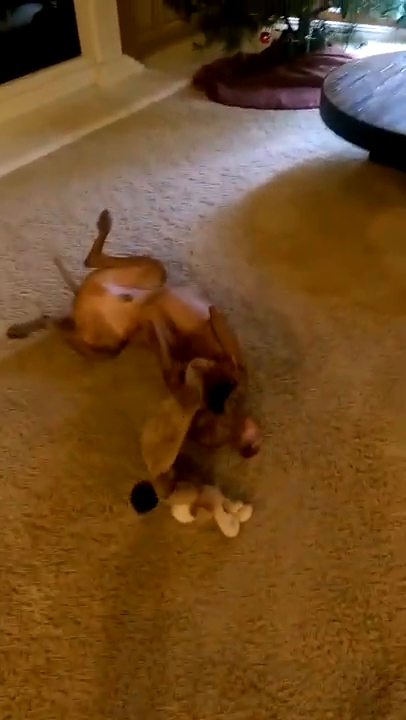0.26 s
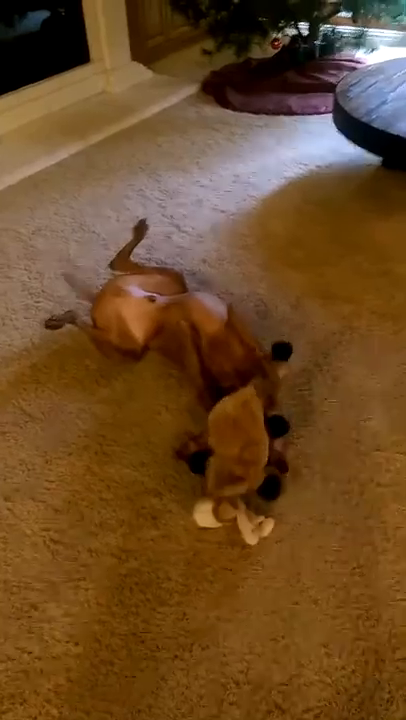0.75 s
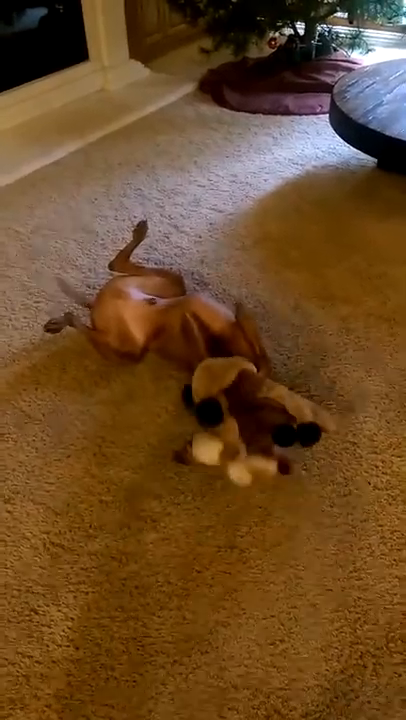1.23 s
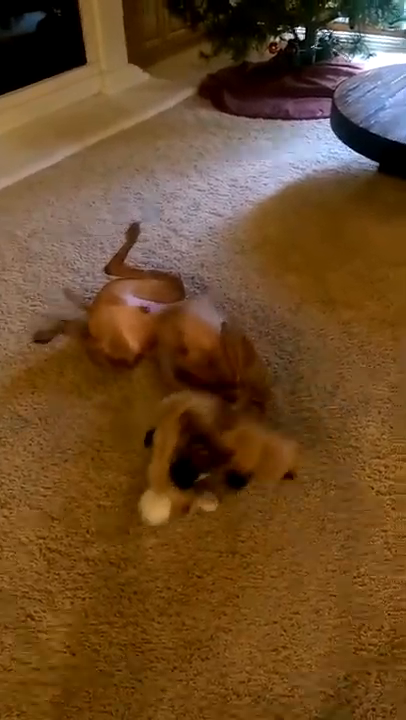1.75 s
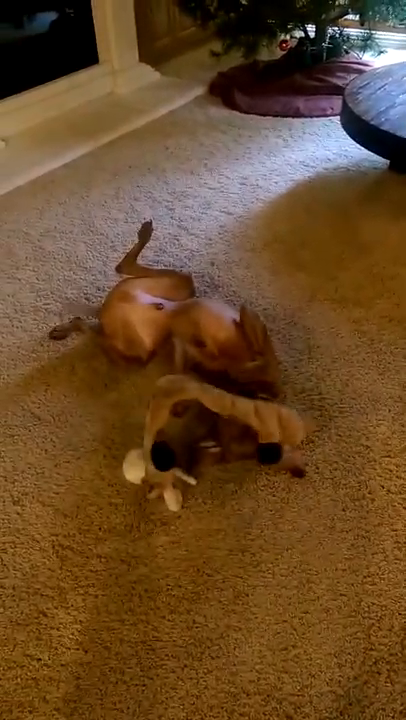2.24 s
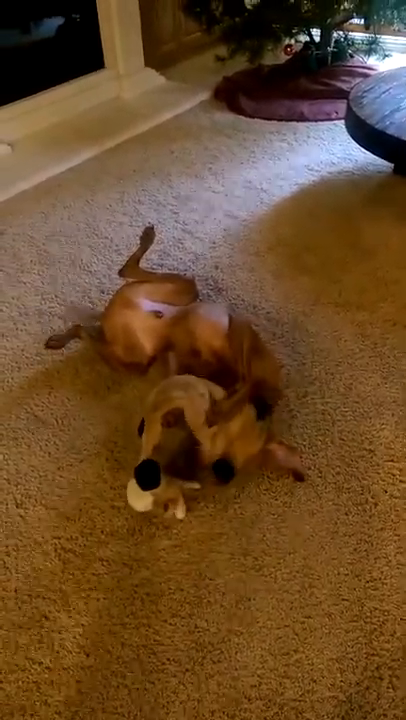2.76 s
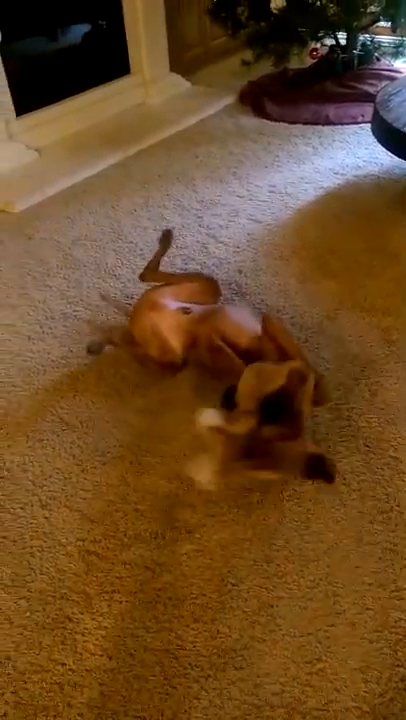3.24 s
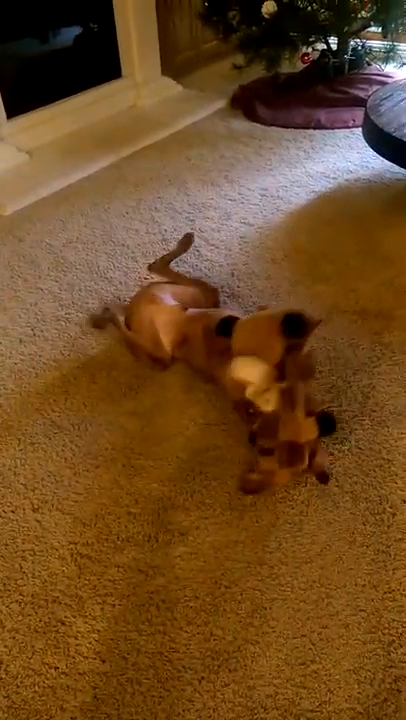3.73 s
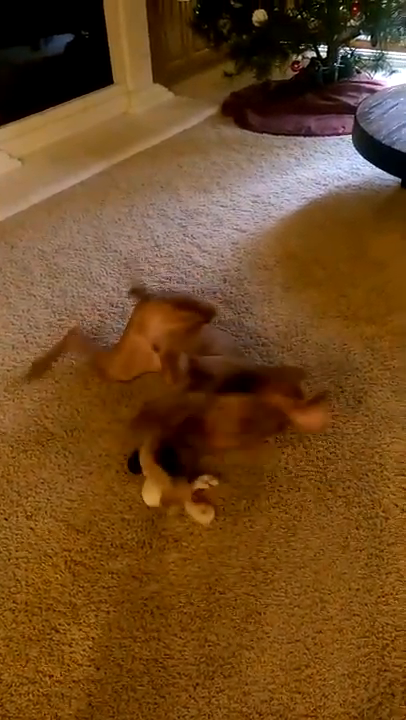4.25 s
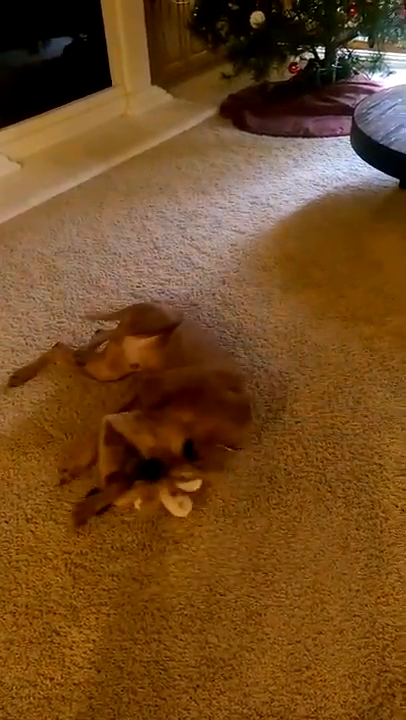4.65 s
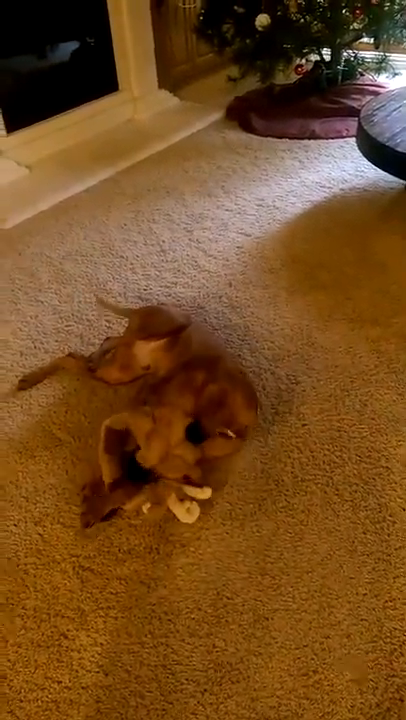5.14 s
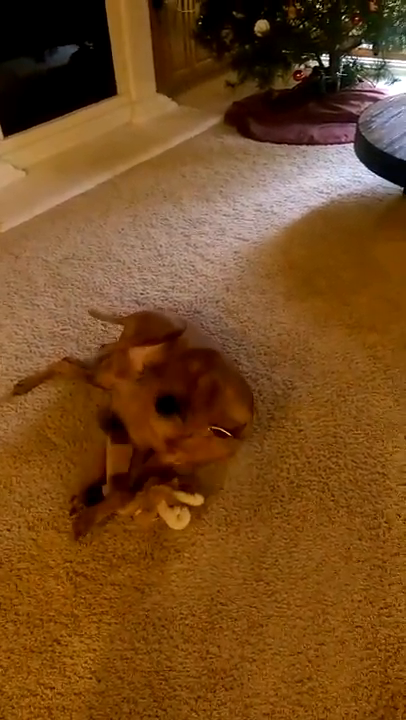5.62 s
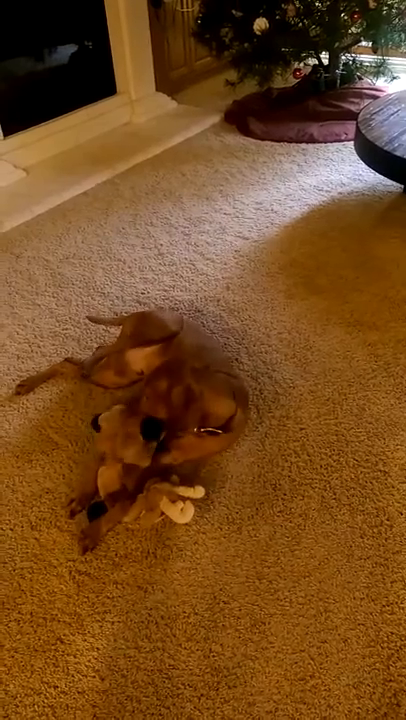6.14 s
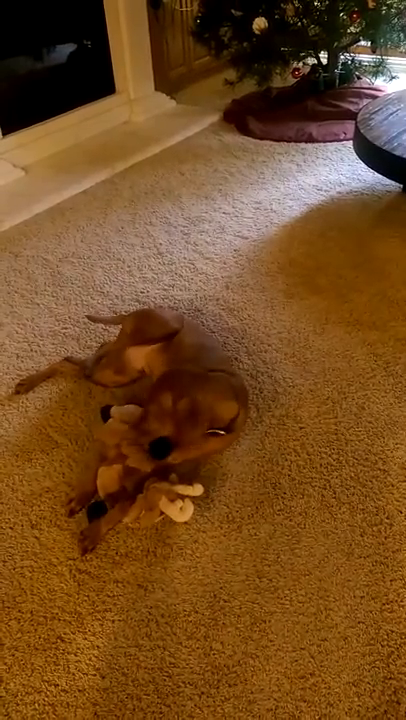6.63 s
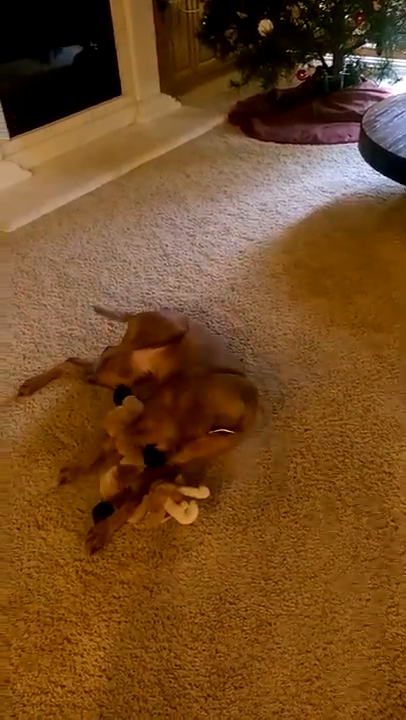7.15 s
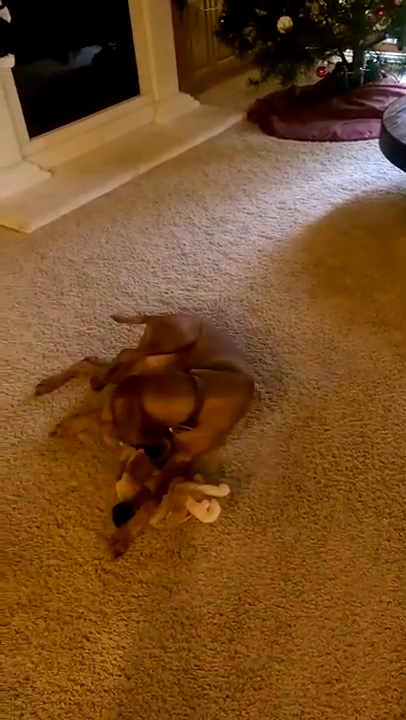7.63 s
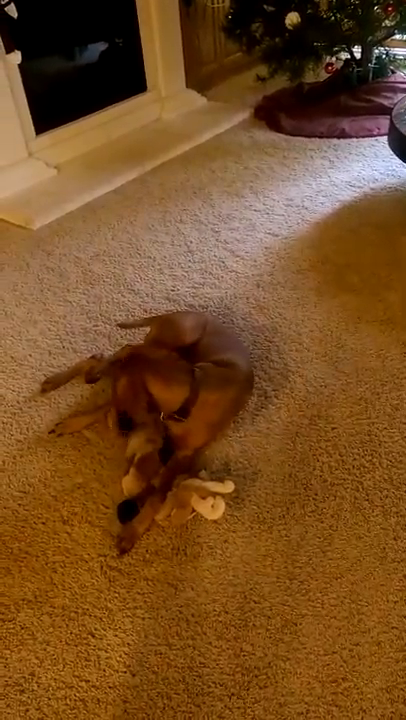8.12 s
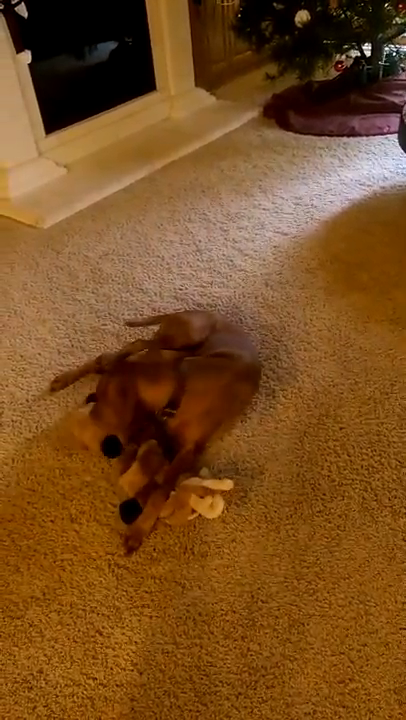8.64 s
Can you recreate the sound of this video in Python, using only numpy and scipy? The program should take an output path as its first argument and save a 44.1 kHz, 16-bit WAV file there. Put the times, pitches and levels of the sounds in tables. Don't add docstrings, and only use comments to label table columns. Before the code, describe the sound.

Indoors on carpet, a dog chews a squeaking plush toy close to a handheld phone, over low mains hum, rumble and faint hiss. A squeak is already fading at the start; quick chirps follow at 0.2 and 0.3 seconds, then a blip and a leaping, falling squeak near 0.8-0.9. Light rustle and faint wheezing air lead to one high quick bite at 2.1. After a lull, the busiest run goes from 3.4 to 5.7: raspy stalling buzzes, a steady high squeak at 3.6, arches and croaks, sharp teeth knocks, plush rubbing, and a very steep shrill chirp at 5.6. A tag clinks faintly at 4.9 and brightly at 6.1, beside a flat buzz and low squeak. Then mostly quiet rustle, with a clear clink at 6.9 and a soft tick at 7.8. Weak low squeaks come at 8.0, 8.15 and 8.5. Short room echoes trail each sound, nearer on the left.

```python
import sys
import numpy as np
from scipy import signal
from scipy.io import wavfile
from scipy.ndimage import uniform_filter1d

SR = 44100
rng = np.random.default_rng(int(sys.argv[2]) if len(sys.argv) > 2 else 0)


def volts(x):
    e = np.asarray(x, float) / 20
    return 10 ** e


def store_wav(level_fs):
    pcm = np.round(np.clip(np.atleast_2d(level_fs), -1, 1) * 32767)
    wavfile.write(sys.argv[1], SR, pcm.T.astype(np.int16))


N = 391608
LEAD = 11025

# (start [s], length [s], pitch [Hz], surge after [s])
REFILLS = [
    (0.792, 0.014, 823, 0.014),
    (5.445, 0.092, 845, 0.064),
]
SURGE_UP, SURGE_DB, SURGE_S = 0.032, 1, 0.015
DROOP, DROOP_S = 0.034, 0.015
# (start [s], rise [s], settling [s], top pitch [Hz], end pitch [Hz])
BITES = [
    (-.18, 0.033, 0.15, 1150, 1093),
    (2.119, 0.034, 0.026, 1732, 1177),
    (8.151, .02, 0.038, 1047, 890),
    (8.525, 0.014, 0.0085, 940, 960),
]
ONSET_HZ, SETTLE_S, FAINT_DB, FAINT_HZ = 908, .02, -8.5, 162
# (time [s], reed pitch [Hz], push [dB])
WRESTLED = [
    [(.171, 841, 0), (.18, 777, -7.5), (.2, 832.5, -1), (.234, 850, 0), (.25, 1590, -0.5), (.263, 2177, 1),
     (.274, 3120, 3.5), (.282, 3000, -9), (.293, 2600, -3)],
    [(.324, 950, -3), (.35, 974, -3), (.356, 1071, -3), (.385, 1211, 0), (.41, 1166, -0.5),
     (.435, 1144, -0.5), (.452, 962, -2.5)],
    [(.88, 870, -5), (.89, 1291, -4.5), (.903, 1457, 1.5), (.93, 1191, -5), (.96, 1066, -5.5),
     (.985, 884, -20), (1.03, 759, -16)],
    [(4.518, 938, -10.5), (4.532, 1060, -1.5), (4.553, 1320, -0.5), (4.579, 1264, -0.5),
     (4.584, 1490, -2.5), (4.593, 1490, 2.5), (4.597, 1616, 0.5), (4.604, 1079, -6.5), (4.625, 840, -12.5)],
    [(5.555, 897, -14), (5.575, 1147, -5.5), (5.59, 2222, 4), (5.6, 3247, -3), (5.606, 3380, -1),
     (5.62, 3184, 0.5), (5.638, 2444, 2.5), (5.652, 1285, -3), (5.68, 843, -13)],
]
# (time [s], reed pitch [Hz], push [dB])
STALLED = [
    [(4.427, 822, -1), (4.435, 870, 1), (4.445, 900, 2.5), (4.455, 871, -4), (4.47, 880, -18.5)],
    [(3.456, 834, 5.5), (3.48, 832, -2.5), (3.495, 689, -12.5), (3.505, 772, -6), (3.518, 777, 5.5)],
    [(3.982, 770, 2.5), (3.99, 890, -2), (4.002, 863, 3), (4.015, 787, -5), (4.032, 820, 0),
     (4.046, 780, -6.5)],
    [(5.038, 950, -6), (5.05, 1074, 0), (5.06, 1314, 0.5), (5.075, 1110, -0.5), (5.1, 977, -3),
     (5.118, 1024, -3), (5.14, 824, -9)],
]
# (time [s], reed pitch [Hz], level [dB])
HELD = [
    [(3.614, 1010, -29.5), (3.62, 1085, -29.5), (3.632, 1197, -26), (3.672, 1205, -30),
     (3.684, 1214, -29.5), (3.7, 1212, -29.5), (3.718, 1205, -27.5)],
    [(4.064, 850, -40), (4.078, 1169, -31), (4.086, 1289, -24.5), (4.11, 1796, -23.5), (4.118, 1648, -29),
     (4.134, 1190, -25.5), (4.15, 947, -39), (4.16, 838, -32.5)],
    [(6.045, 840, -36), (6.053, 820.4, -34.5), (6.119, 830, -36), (6.139, 864, -32.5), (6.153, 830, -34),
     (6.165, 815, -36)],
    [(6.182, 900, -43), (6.194, 984, -37), (6.212, 1111, -29), (6.214, 1108, -31), (6.238, 945, -35),
     (6.272, 952, -35), (6.286, 916, -40.5), (6.302, 913, -32)],
    [(7.956, 817, -45.5), (7.968, 852, -43.5), (8.0, 832, -43), (8.024, 868, -41), (8.052, 828, -42),
     (8.106, 818, -43.5), (8.122, 760, -47)],
]
# (effort [dB], air out 1 or in 0, jaws open [dB], plush cover [dB], cheek hollow [dB])
GRIP = [(-35.5, 0.97, -5, 9, 2.5), (-26.5, 0.13, 3, 2, -1), (-29, 0.89, -3.5, -0.5, 2.5),
        (-32.5, -0.19, -0.5, 6, 1.5), (-28.5, 0.92, -2.5, -0.5, 5), (-26.5, 0.86, -1.5, 0.5, 2.5),
        (-27, -0.15, -3.5, -3.5, -3.5), (-25, 1, -5, 0, -6), (-27.5, -0.63, -2.5, -4.5, 2),
        (-23.5, 0.63, -5, -0.5, -2.5), (-29, -0.43, -6.5, -1.5, -2), (-27, 0.58, 4, -0.5, 2),
        (-27.5, 0.89, 5, -4, 1.5), (-28.5, -.3, 6, -2.5, 6.5), (-23.5, 0.78, 4.5, -2.5, -1),
        (-29.5, -0.43, 10.5, -1.5, -2.5), (-27, 0.95, 20.5, 11.5, 0.5), (-42.5, 0.17, 5.5, 5.5, -0.5),
        (-37.5, 1, 8.5, 12.5, 5.5), (-31, 1, 17, 19.5, 5.5)]
# (lips sealed over lowest band [dB], tongue under middle [dB], teeth gap [dB])
SEAL = [(3, -4.5, -6), (-1.5, -1.5, 2.5), (1, 1.5, -0.5), (-0.5, -4, -1), (0, 0, 0), (-1.5, .5, -0.5),
        (1, 3.5, 3), (-1.5, -1.5, 0), (-2.5, 0.5, 2.5), (-2, -0.5, .5), (-1, -4, -1.5), (-1, 0, 0),
        (-0.5, -0.5, -0.5), (-1, -0.5, -1.5), (-3, 0.5, 0.5), (.5, .5, -1.5), (-1.5, -4, -1),
        (0.5, -2, -0.5), (-2, -1.5, 1.5), (2, -3.5, -1.5)]
# (notch of carpet echo [Hz], left minus right [dB], extra sent to room [dB])
PLACES = [(7000, 9.5, -3), (7650, 5, -1), (6780, 6, 0), (7200, 6.5, 4), (6760, 4.5, 1.5), (6800, 5.5, 2.5),
          (7140, 5, -1), (6900, 5.5, 0), (7700, 4, -2.5), (7100, 5.5, 0), (7950, 5, 1.5), (6850, 5.5, -2),
          (6770, 4, -1.5), (7220, 4, -3), (6760, 5, -1), (4540, 5, -0.5), (6500, 3.5, 0), (9000, 5, 3),
          (6270, 4.5, 3.5), (6600, 5, 4)]
LEAK = [-4, -18, -13, -6, -5, -9, -15, -6, -18, -7, -20, -15, -17, -27, -17, -36, -12, -32, -6, -5]
LIMP = [0, 0, .02, 0, .01, .03, 0, .033, 0, .03, 0, 0, 0, 0, 0, 0, 0, 0, .035, .035]

# (low edge [Hz], high edge [Hz])
MUFFLE_HZ = [(600, 1400), (1400, 2800), (2800, 4400), (4400, 6200), (6700, 8400), (9000, 12000),
             (12000, 15500)]
AIR_IN_DB = [-15, -4, -11, -5.5, -12, -19, -22]
AIR_OUT_DB = [-7.5, -5, -9, -4.5, -19.5, -11.5, -12.5]
JAW_SHARE = [-0.19, -0.11, -0.041, -0.36, 0.9, 0.56, 0.2]
COVER_SHARE = [0.23, -0.13, 0.19, -0.29, -0.11, -0.41, -2]
CHEEK_SHARE = [0, 0.92, 0.023, 0.1, 0, 0.088, 0]
SEAL_SHARES = [
    [1, 0, 0, 0, 0, 0, 0],
    [0, 0, 1, 0, 0, 0, 0],
    [0, 0, 0, 1, .5, 0, 0],
]
FRAY_HZ, LOW_SHARE = 2800, .7
SCATTER_DB = 6

# (frequency [Hz], level [dB], t60 [s])
TAG = [(5652, -14, .4), (5825, -18, .13), (9200, -30, .1), (12030, -24, .35), (12810, -26, .25),
       (13700, 0, .42), (14990, -28, .12)]
TWIST_HZ = 12030
TOUCH_DB, TOUCH_S, HELD_DB_PER_S = -23, 0.0082, -120
# (time [s], peak [dB], tilt of ringing [dB per octave], tick [dB], off-centre [dB])
CLINKS = [
    (4.925, -64, -14, 14.5, 23),
    (4.951, -63, -1, -11.5, 21),
    (6.068, -45, -11, 4, 2),
    (6.902, -44, -4, 6, -1),
    (6.947, -82, -2, 18, 0),
    (7.765, -69, -1, 11, 0.1),
]
# (time [s], peak [dB], centre [Hz], length [s])
KNOCKS = [(0.686, -47.5, 5510, 0.0031), (0.735, -57, 9000, 0.0022), (0.749, -52.5, 7000, 0.0052),
          (1.173, -47.5, 10000, .003), (1.192, -48, 11500, 0.0054), (1.744, -63, 2500, .003),
          (2.164, -50, 250, 0.027), (3.043, -58.5, 5050, 0.0024), (3.358, -53, 1270, 0.005),
          (3.398, -55, 2500, 0.016), (3.416, -45, 11500, 0.029), (3.421, -50, 2530, 0.02),
          (3.967, -39, 3140, 0.0042), (4.595, -23, 4540, 0.0064), (4.916, -42, 1404, 0.0019),
          (4.918, -50, 593, 0.0044), (4.916, -40.5, 7000, 0.0011), (3.714, -23.5, 2390, 0.0034),
          (3.72, -38, 1200, .005), (2.172, -43.5, 750, 0.0089), (8.153, -48, 2500, .003),
          (8.19, -47, 1400, 0.0091), (8.523, -43.5, 1400, .004), (8.535, -49, 1400, .008),
          (7.97, -44, 5000, .003), (5.442, -37.5, 4960, 0.0036), (8.433, -55, 2820, 0.0055),
          (8.44, -53.5, 5000, 0.0045), (8.463, -59, 5000, .004)]
# (peak time [s], level [dB], rise [s], fall [s])
RUSTLE = [(1.13, -60.5, 0.009, 0.2), (1.516, -66.5, 0.14, 0.072), (1.9, -67, 0.063, 0.027),
          (2.068, -65, 0.14, 0.059), (3.214, -70, 0.0085, 0.15), (3.429, -55, 0.088, 0.029),
          (3.85, -56, .01, 0.18), (3.97, -51, .05, 0.02), (4.79, -58, 0.0093, 0.16),
          (6.836, -71, 0.0091, 0.096), (7.01, -72.5, .01, 0.15), (7.288, -67.5, .2, .1),
          (7.468, -73, .15, 0.057), (7.764, -67.5, 0.021, 0.23), (7.95, -63, .02, .01),
          (8.118, -49, 0.0092, 0.032), (6.168, -51, .01, .03), (8.31, -69, .01, 0.21),
          (8.443, -64.5, 0.021, 0.041)]
# (frequency [Hz], level [dB per Hz])
RUSTLE_COLOUR = [(470, -46), (800, -18.5), (1420, -7), (1740, -16.5), (2500, -4.5), (3650, -7),
                 (11300, -13.5), (16000, -20)]
STROKE_DB = -17
# (start [s], length [s], frequency [Hz], level [dB])
WHEEZES = [
    (1.971, .14, 2120, -73),
    (2.04, 0.049, 1290, -68),
]

# (frequency [Hz], level [dB])
PHONE = [(300, -39.5), (700, 1), (1000, -2.5), (5000, 4.5), (12000, 1.7), (14300, -4.5), (15300, -8),
         (15900, -13.5)]
# (frequency [Hz], share of left-right difference [dB per dB])
SHADOW = [(850, 0.48), (1200, 1.3), (2400, 2.06), (5000, 3.5), (9000, 5), (12000, 3.5), (15000, -0.9)]
# (frequency [Hz], t60 [s])
ROOM = [(600, 0.51), (1600, 0.56), (4200, 0.52), (8000, 0.5), (13000, 0.34)]
# (delay [s], level [dB])
ECHOES = [(.0021, -10), (.0068, -11), (.0115, -12), (.017, -13), (.024, -14)]
# (frequency [Hz], level [dB], t60 [s])
STANDING = [(950, -14.5, .5), (1110, -17.5, .5), (1205, -3.5, .8), (1500, -11, .6), (1690, -4.5, 0.9),
            (1890, -7.5, .6), (2030, -6.5, .6), (2410, -9.5, .7)]
# (frequency [Hz], level [dB])
ROOM_LEFT = [(600, 2), (850, -5), (1100, -1.5), (1500, -5), (4000, -2), (8000, -1.5), (13000, 3)]
# (frequency [Hz], level [dB])
ROOM_RIGHT = [(600, 2.5), (850, -5.5), (1100, -0.5), (1500, -1), (4000, -2), (8000, -11.5), (13000, 1.5)]
# (frequency [Hz], level [dB per Hz])
HUSH = [(12, -27.5), (25, -6.5), (48, -19), (75, -14.5), (117, 0), (169, -20.5), (217, -0.5), (296, -12.5),
        (426, -14), (518, -12), (1140, -17), (3000, -23), (14000, -26.5), (15800, -28.5)]
HUSH_DB = -60
# (frequency [Hz], width [Hz], level [dB])
HUM = [(61, 10, -70), (165, 8.2, -72.5), (211.5, 12, -67.5), (250, 23, -81), (292, 11.6, -76.5),
       (357, 24, -72), (421.7, 14, -71)]
# (frequency [Hz], correlation [-1 to 1])
SAME = [(60, 0.43), (180, 0.88), (550, 0.34), (1650, 0.32), (4970, 0.051), (15000, -0.39)]
# (frequency [Hz], left minus right [dB])
LEAN = [(60, 4.07), (180, 0.65), (550, 0.91), (1650, 1.0), (4970, 3.1), (15000, 1.57)]
STIR_DB, STIR_LAG_S, STIR_S = 10.5, 0.036, 0.34
EDGE_HZ = 16100


def evened(x):
    return x / np.sqrt(np.mean(x ** 2) + 1e-20)


def read(points, hz):
    f, value = np.transpose(points)
    return np.interp(np.log(hz + 1), np.log(f + 1), value)


def add(mix, s, sound):
    part = mix[..., LEAD + round(s * SR):][..., :sound.shape[-1]]
    part += sound[..., :part.shape[-1]]


def causal(db_of, x):
    log_gain = np.log(volts(db_of(abs(np.fft.fftfreq(2048, 1 / SR)))))
    taps = np.fft.ifft(np.exp(np.conj(signal.hilbert(log_gain)))).real[:1024]
    return signal.oaconvolve(x, taps)[:len(x)]


def slow(count, span):
    noise = rng.standard_normal(count)
    return evened(uniform_filter1d(uniform_filter1d(noise, span), span))


def bass(x):
    return signal.sosfiltfilt(signal.butter(3, FRAY_HZ, fs=SR, output="sos"), x)


def ports(x, pan_db):
    far = causal(lambda hz: -pan_db * read(SHADOW, hz), x)
    return volts(3.5) * np.array([x, np.roll(far, 2)])


def refill(start, length, hz, surge_s):
    t = np.linspace(0, length, num=40)
    surge = np.exp(-((t - surge_s) / SURGE_S) ** 2)
    droop = DROOP * np.exp((t - length) / DROOP_S)
    return np.transpose([start + t, hz * (1 + SURGE_UP * surge - droop), SURGE_DB * surge])


def bite(start, rise_s, settle_s, top_hz, end_hz):
    t = np.linspace(0, rise_s + settle_s, num=40)
    left = np.exp(-np.maximum(t - rise_s, 0) / SETTLE_S)
    hz = end_hz + (top_hz - end_hz) * (left - left[-1]) / (1 - left[-1])
    hz = hz - (top_hz - ONSET_HZ) * np.maximum(1 - t / rise_s, 0)
    return np.transpose([start + t, hz, FAINT_DB * np.exp((ONSET_HZ - hz) / FAINT_HZ)])


def strokes_of_jaw():
    rows = [refill(*r) for r in REFILLS] + [bite(*r) for r in BITES]
    rows += [np.array(r) for r in WRESTLED + STALLED]
    rows += [np.array(r) - [0, 0, np.max(r, axis=0)[2]] for r in HELD]
    return sorted(rows, key=lambda r: r[0, 0])


def mouth_colour(out, hold_db):
    air_in, air_out = np.array([AIR_IN_DB, AIR_OUT_DB])
    shares = np.array([JAW_SHARE, COVER_SHARE, CHEEK_SHARE, *SEAL_SHARES])
    return air_in + out * (air_out - air_in) + np.dot(hold_db, shares)


def squeak(rows, muffling, notch_hz, pan_db, leak_db, limp):
    s, hz, level_db = np.transpose(rows)
    t = np.arange(s[0], s[-1], 1 / SR)
    hz = uniform_filter1d(np.interp(t, s, hz), 200, mode="nearest")
    wobble = .004 * slow(len(t), 40)
    flutter = .06 * volts(leak_db) * slow(len(t), 16)
    order = np.arange(1, 22)[:, None]
    turns = np.cumsum(hz * (1 + wobble)) / SR
    turns = turns + np.clip((order - 1) / 4, 0, 1) * np.cumsum(hz * flutter) / SR
    limp = limp * np.clip((hz - 1120) / 60, 0, 1) * volts(3 * slow(len(t), 150))
    turns = turns + (order > 1) * limp * np.cos(np.pi * turns)
    push_db = np.interp(t, s, level_db)
    sag_db = level_db.max() - push_db
    round_db = 3.1 * np.log2(hz / 850) + 0.2 * sag_db
    strength_db = 2.0 * np.array([slow(len(t), 200) for _ in order]) - round_db * np.log2(order)
    harmonics = volts(strength_db) * (order * hz < 16500) * np.cos(2 * np.pi * order * turns)
    snaps = harmonics.sum(0)
    leak = rng.standard_normal(len(t)) * (0.57 + np.exp(-(turns[0] % 1) / 0.3))
    leak = evened(signal.lfilter([1, -.6], 1, leak)) * volts(.4 * sag_db)
    leak = evened(leak) - LOW_SHARE * bass(evened(leak))
    per_hz = [(np.sqrt(a * b), db - 10 * np.log10(b - a)) for (a, b), db in zip(MUFFLE_HZ, muffling)]

    def colour_db(f):
        carpet_notch = 12.0 * np.exp(-((f - notch_hz) / 400) ** 2)
        return read(per_hz, f) + read(PHONE, f) - carpet_notch

    tone = causal(colour_db, evened(snaps) + volts(leak_db) * leak)
    tone /= np.sqrt(uniform_filter1d(tone ** 2, 500, mode="reflect") + 1e-20)
    edges = np.clip(np.minimum((t - s[0]) / .004, (s[-1] - t) / .006), 0, 1)
    return ports(volts(push_db) * edges * tone, pan_db)


def wheeze(length, hz, db):
    t = np.arange(0, length, 1 / SR)
    return volts(db) * slow(len(t), span=150) * np.hanning(len(t)) * np.sin(2 * np.pi * hz * t)


def knock(db, hz, length):
    t = np.arange(4000) / SR
    burst = rng.standard_normal(4000) * np.exp(-t / length * 0.64)
    burst = causal(lambda f: -13 * abs(np.log2((f + 20) / hz)), burst)
    return ports(volts(db) * burst / abs(burst).max(), 4.0)


def clink(db, tilt_db, tick_db, twist_db, free_s):
    t = np.arange(SR // 3) / SR
    stilled_db = TOUCH_DB * np.clip((t - free_s) / TOUCH_S, 0, 1)
    stilled_db = stilled_db + HELD_DB_PER_S * np.maximum(t - free_s, 0)
    ring = np.zeros(len(t))
    for hz, mode_db, t60 in TAG:
        struck_db = mode_db + tilt_db * np.log2(hz / 13700) + twist_db * (hz == TWIST_HZ)
        fade_db = stilled_db * hz / 13700 - 60 * t / t60
        ring += volts(struck_db + fade_db) * np.sin(2 * np.pi * hz * t)
    tick = signal.lfilter([1, -.55], 1, rng.standard_normal(len(t))) * volts(tick_db - 60 * t / 0.015)
    return ports(volts(db) * (ring + tick), 4.5)


def rustle(peak_s, db, rise_s, fall_s):
    s = [peak_s - rise_s, peak_s, peak_s + fall_s]
    level_db = [db + STROKE_DB, db, db + STROKE_DB]
    t = np.arange(s[0], s[-1], 1 / SR)
    slips = rng.standard_normal((2, len(t))) * volts(2.7 * slow(len(t), 150))
    slips = np.array([causal(lambda f: np.maximum(read(RUSTLE_COLOUR, f), -40), v) for v in slips])
    return evened(slips) * volts(np.interp(t, s, level_db) - 1.5) * signal.windows.tukey(len(t), .02)


def room(x):
    taps = np.zeros((2, SR))
    at = np.arange(300, SR - 20, 20) + rng.integers(0, 20, (2, (SR - 301) // 20))
    np.put_along_axis(taps, at, rng.choice([-1., 1.], at.shape), 1)
    hz, t, z = signal.stft(taps, SR, nperseg=256)
    port_db = np.array([read(ROOM_LEFT, hz), read(ROOM_RIGHT, hz)])[:, :, None]
    decay_db = 60 * t / read(ROOM, hz)[:, None]
    tail = signal.istft(z * volts(port_db - decay_db), SR, nperseg=256)[1]
    tail /= np.sqrt(SR / 20 * .04)
    for s, db in ECHOES:
        tail[[0, 1], round(s * SR) + rng.integers(0, 30, 2)] += volts(db - 3)
    t = np.arange(tail.shape[1]) / SR
    for f, db, t60 in STANDING:
        unit_gain = 2 * np.log(1000) / (t60 * SR)
        tail += volts(db - 60 * t / t60) * np.sin(2 * np.pi * f * t) * unit_gain
    return signal.fftconvolve(x.mean(0)[None], tail, axes=1)[:, :x.shape[1]]


def hush():
    frames, hz = N // 1024 + 5, np.fft.rfftfreq(4096, 1 / SR)
    a, b, c, d = rng.standard_normal((frames, 2049, 4)).T
    same, left = np.clip(read(SAME, hz), -1, 1)[:, None], a + 1j * b
    z = np.array([left, same * left + np.sqrt(1 - same ** 2) * (c + 1j * d)])
    hiss = volts(2 * read(HUSH, hz))
    power = hiss / hiss.sum() * volts(2 * HUSH_DB)
    for f, width, db in HUM:
        line = np.exp(-.5 * ((hz - f) / (0.45 * width)) ** 2)
        power = power + line / line.sum() * volts(2 * db)
    t = (np.arange(frames) - 2) * 1024 / SR
    chews = np.array([r[-1, 0] for r in strokes_of_jaw()])
    stir_db = STIR_DB * np.exp(-((t[:, None] - chews - STIR_LAG_S) / STIR_S) ** 2).max(axis=1)
    stir_share = read([(60, 0.31), (150, 0.41), (450, 0.47), (600, 0.061)], hz)[:, None]
    z *= np.sqrt(power)[:, None] * volts(stir_db * stir_share)
    z *= volts(np.multiply.outer([.5, -.5], read(LEAN, hz)))[:, :, None]
    return volts(-3.0) * signal.istft(z, nperseg=4096, noverlap=3072)[1][:, :N]


def hum():
    t = np.arange(N) / SR
    lines = [(60, -72.5), (120, -66.5), (419, -77.5)]  # (frequency [Hz], level [dB])
    return sum(volts(db + 1.1 * slow(N, 4000)) * np.sin(2 * np.pi * hz * t) for hz, db in lines)


def scene():
    near, sent, soft = np.zeros((3, 2, LEAD + N))
    holds = np.hstack([GRIP, SEAL])
    for rows, hold, place, leak_db, limp in zip(strokes_of_jaw(), holds, PLACES, LEAK, LIMP):
        effort_db, out, *hold_db = hold
        notch_hz, pan_db, room_db = place
        sound = volts(effort_db) * squeak(rows, mouth_colour(out, hold_db), notch_hz, pan_db, leak_db, limp)
        add(near, rows[0][0], sound)
        scatter = 1 + volts(leak_db + SCATTER_DB) * slow(sound.shape[1], span=50)
        blur = sound * (evened(scatter) - 1)
        add(sent, rows[0][0], volts(room_db) * (sound + blur - LOW_SHARE * bass(blur)))
    free = np.diff([s for s, *_ in CLINKS], append=N / SR)
    for source, table in [(clink, np.column_stack([CLINKS, free])), (knock, KNOCKS)]:
        for s, *blow in table:
            sound = source(*blow)
            add(near, s, sound)
            add(sent, s, volts(-0.5) * sound)
    for s, db, rise_s, fall_s in RUSTLE:
        add(soft, s - rise_s, rustle(s, db, rise_s, fall_s))
    house = (near + room(sent) + soft)[:, LEAD:] + hush() + hum()
    air = np.zeros(LEAD + N)
    for s, *whistle in WHEEZES:
        add(air, s, wheeze(*whistle))
    return house + air[LEAD:]


def top_cut(x):
    return signal.sosfilt(signal.butter(12, 16090, fs=SR, output="sos"), x)


def record(dry):
    edge = signal.firwin(301, EDGE_HZ, window=("kaiser", 8), fs=SR)
    mix = signal.oaconvolve(dry - .0004, edge[None], "same")
    return top_cut(mix)


dry = scene()
out = record(dry)
store_wav(out)
```